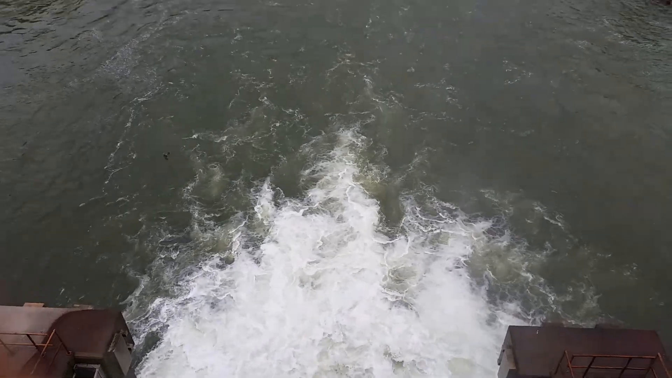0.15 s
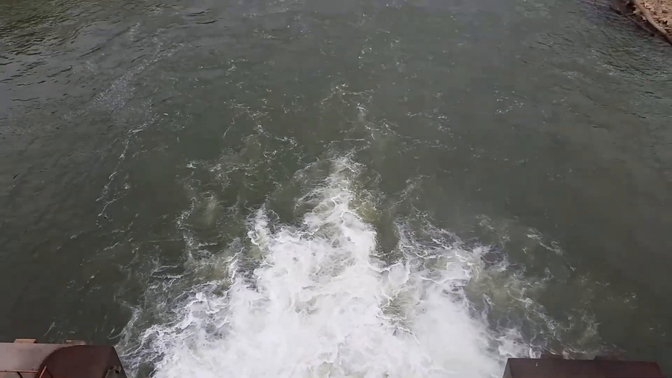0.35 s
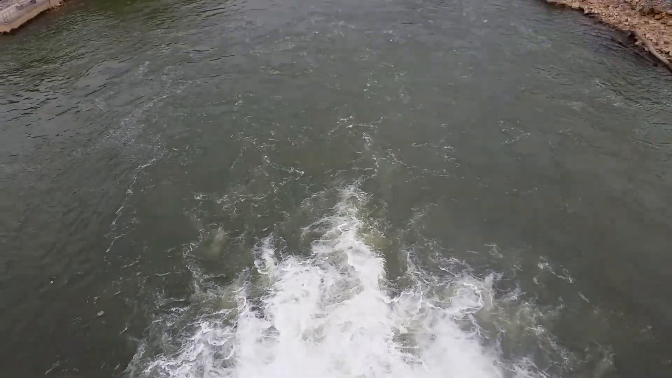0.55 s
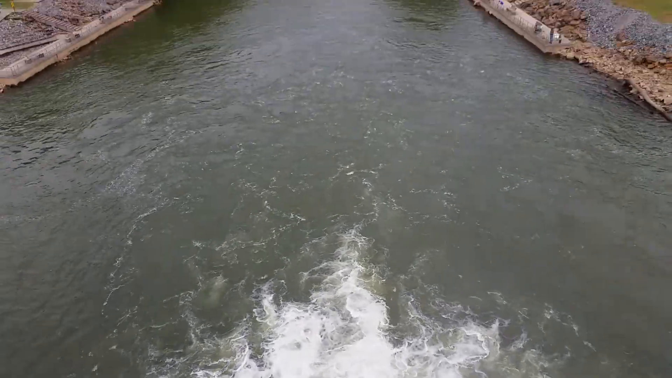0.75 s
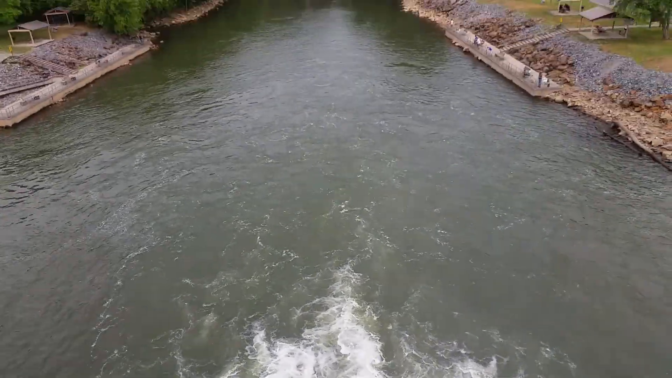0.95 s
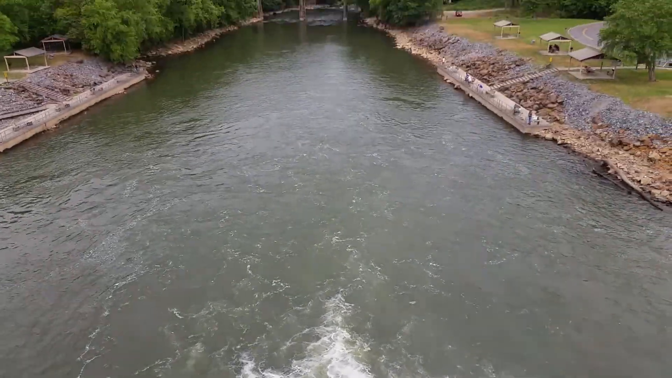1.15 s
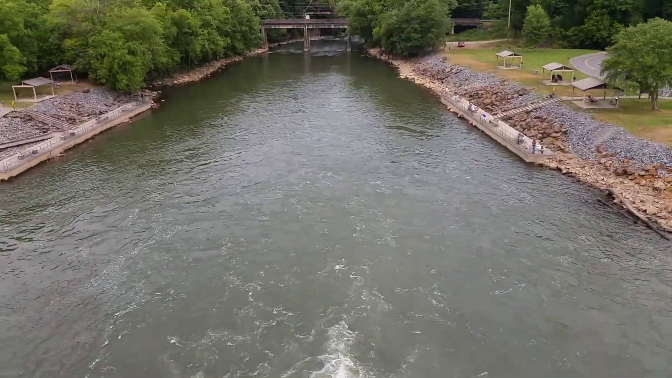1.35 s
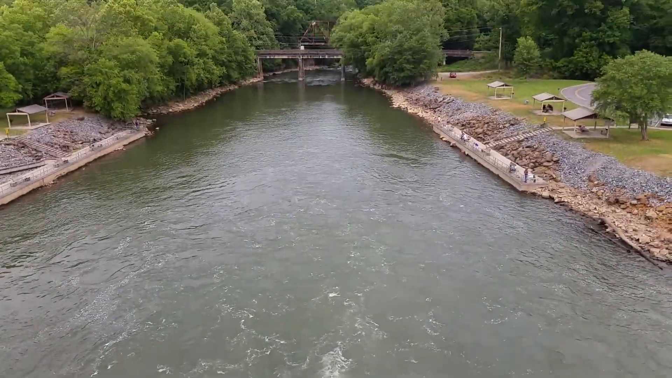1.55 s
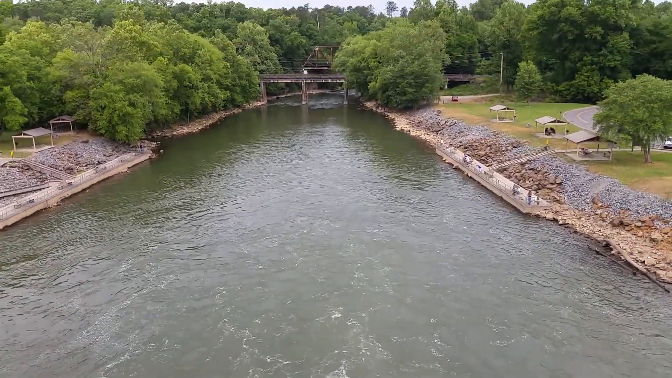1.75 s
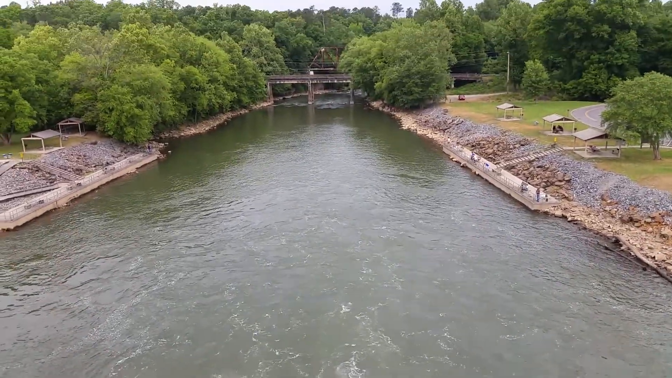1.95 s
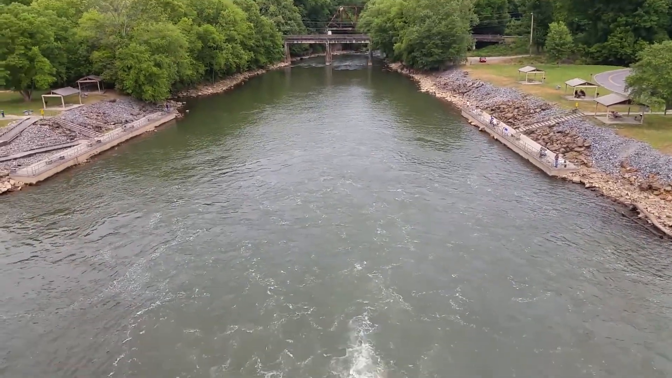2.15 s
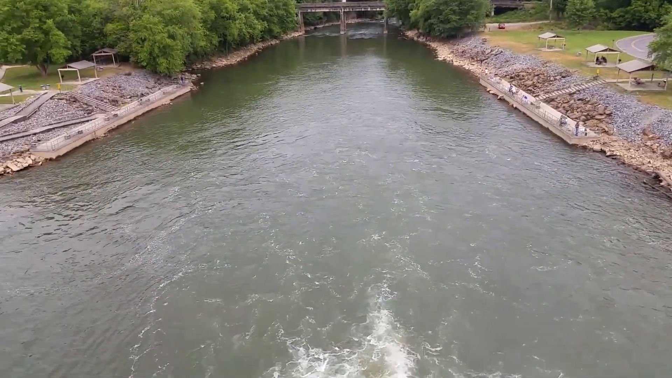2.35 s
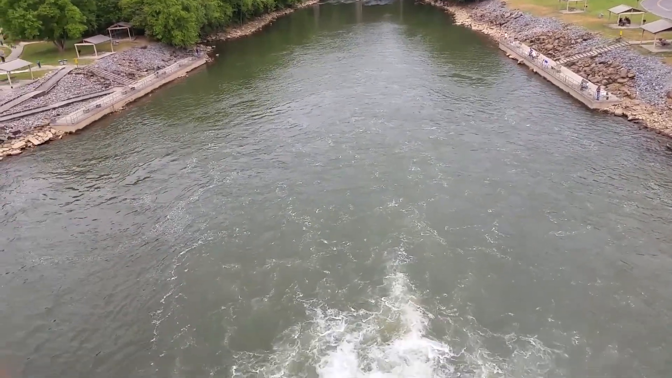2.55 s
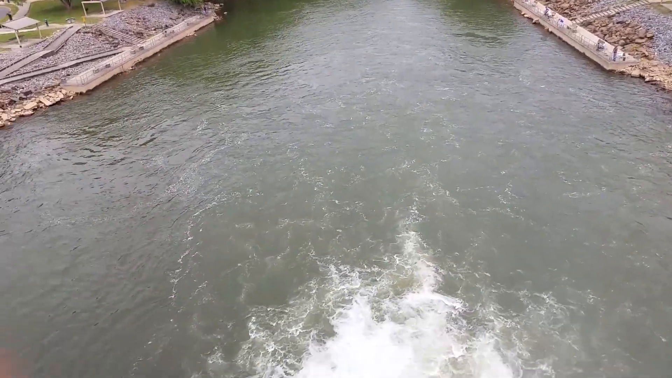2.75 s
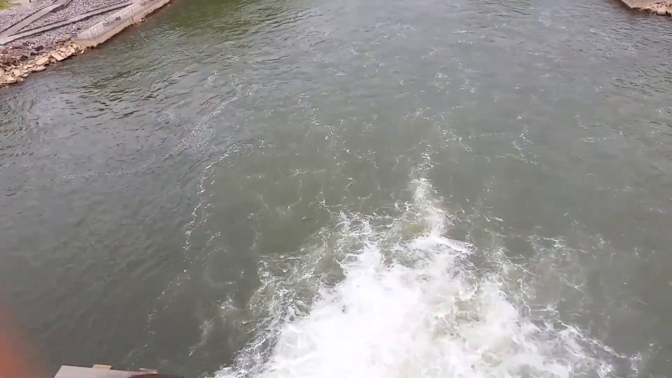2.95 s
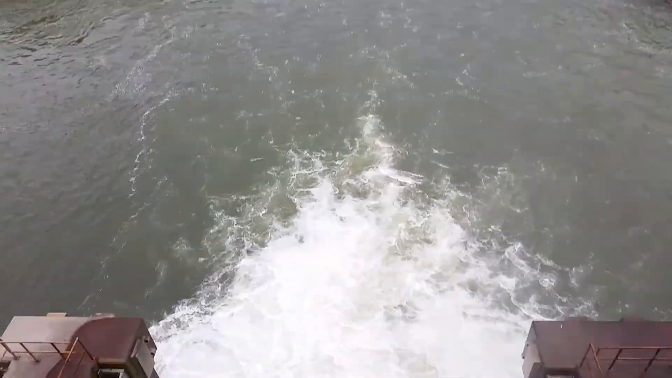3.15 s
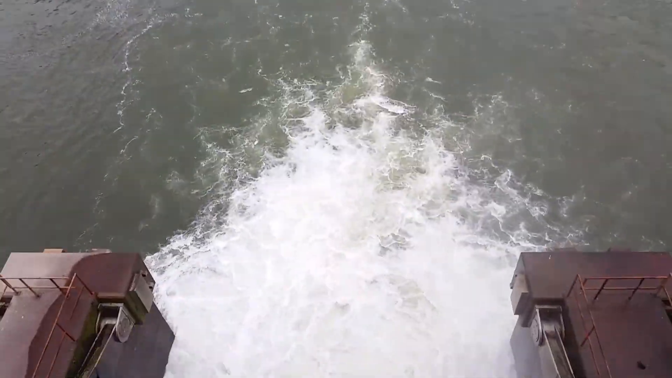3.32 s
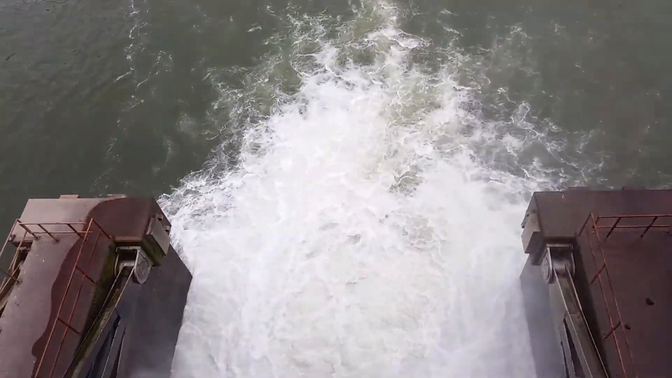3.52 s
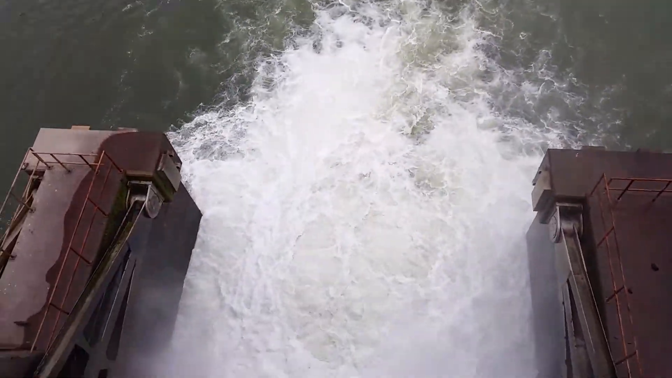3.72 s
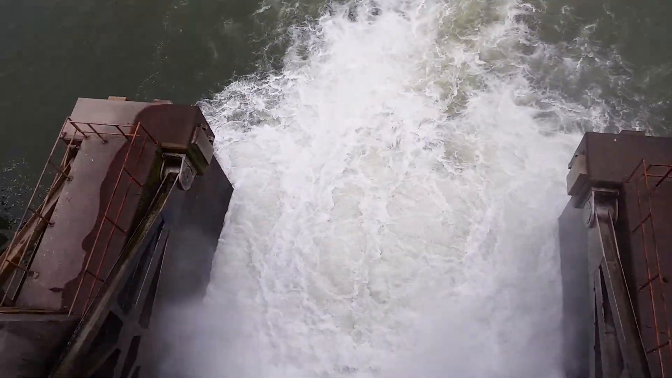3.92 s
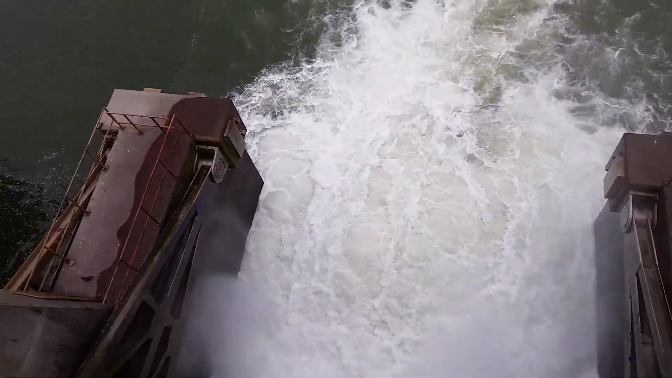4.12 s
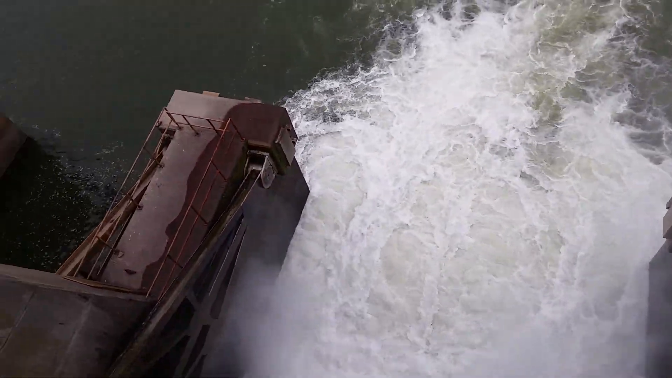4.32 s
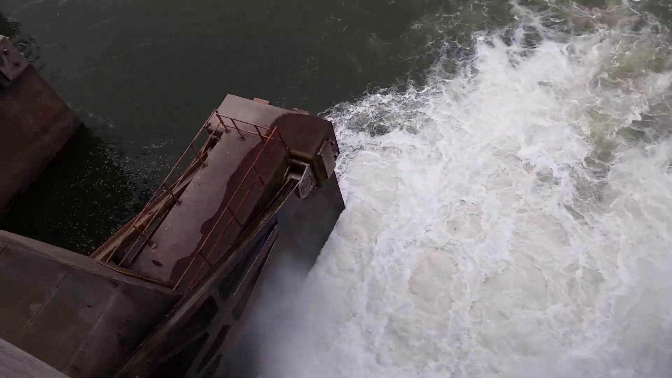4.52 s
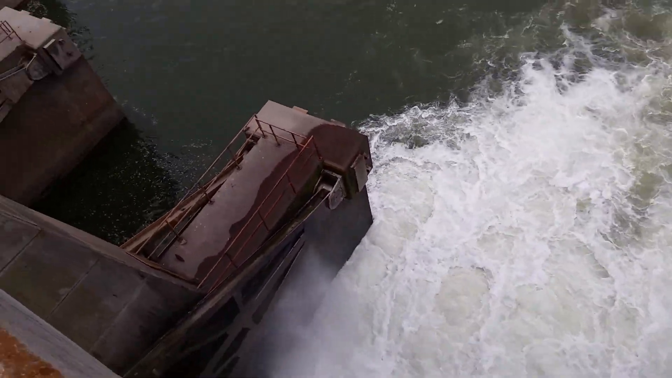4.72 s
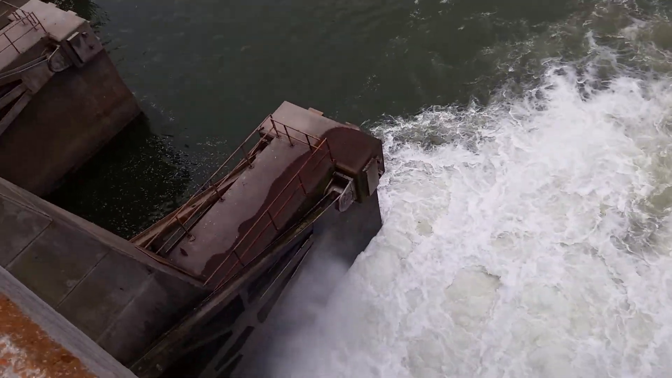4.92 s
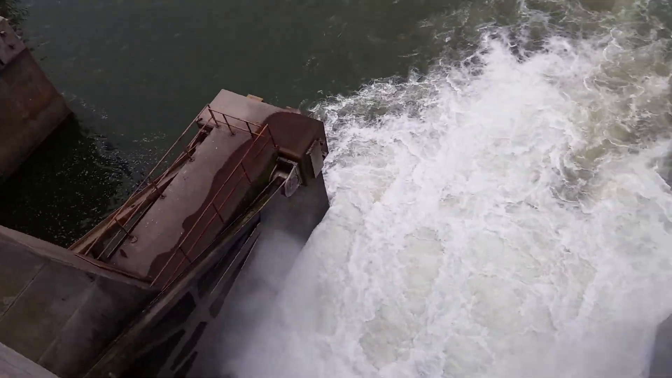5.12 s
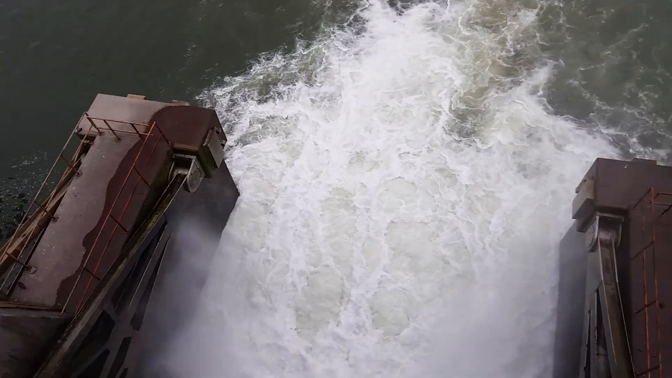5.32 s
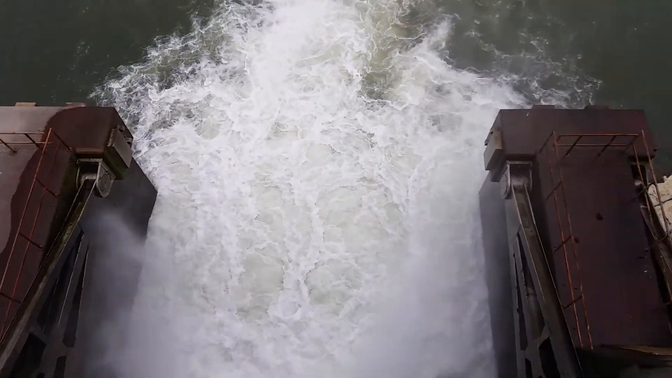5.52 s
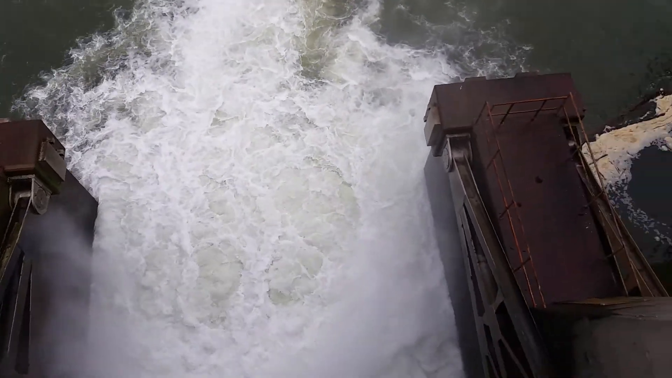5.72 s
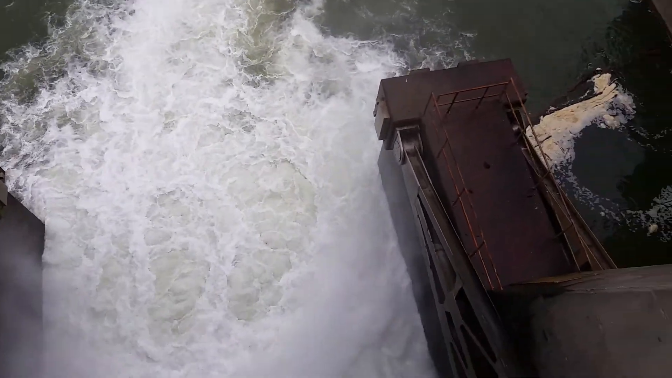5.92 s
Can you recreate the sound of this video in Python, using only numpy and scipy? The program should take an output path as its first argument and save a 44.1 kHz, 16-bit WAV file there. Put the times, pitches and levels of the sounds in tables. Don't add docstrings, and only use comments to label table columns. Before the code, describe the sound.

Outdoors on top of a dam, water blasts from outlet gates below. After brief silence a low rumble and dull, screened roar fade in. Wind gusts buffet the handheld stereo microphone, with thumps and a small click on its case just past three seconds. Then the sound opens into loud, bright, hissing white water that stays steady to the end.

```python
import sys
import numpy as np
from scipy import signal
from scipy.fft import rfft, irfft, next_fast_len
from scipy.io import wavfile
from scipy.ndimage import uniform_filter1d, minimum_filter1d, map_coordinates

SR = 44100
rng = np.random.default_rng(int(sys.argv[2]) if len(sys.argv) > 2 else 0)


def linear_from_db(decibels):
    return 10 ** (np.asarray(decibels, float) / 20)


def inscribe(sig):
    pcm = np.round(np.clip(np.atleast_2d(sig).T, -1, 1) * 32767)
    wavfile.write(sys.argv[1], SR, pcm.astype(np.int16))


N = 263277

# frequency in Hz, left-right likeness from -1 to 1.
ALIKE_IN_VIEW = [(100, 1), (650, .88), (1000, 0.51), (1500, 0.29), (1800, -0.51), (2100, 0.24),
                 (2350, 0.52), (2800, 0.41), (3200, -0.59), (4000, 0.14)]


def unit(x):
    return x / np.sqrt(np.mean(x ** 2) + 1e-20)


def along(points, hz):
    f, v = np.transpose(points)
    return np.interp(np.log(hz + 1), np.log(f + 1), v)


def curves(rows):
    s, *columns = np.transpose(rows)
    t = np.arange(N) / SR
    return np.array([np.interp(t, s, column) for column in columns])


def wobble(rate):
    knots = rng.standard_normal(int(N * 40 / SR) + 4)
    return map_coordinates(knots, [np.arange(N) * min(rate, 40) / SR])


def filtered(x, response):
    m = next_fast_len(N + 8192)
    hz = np.fft.rfftfreq(m, 1 / SR)
    return irfft(rfft(x, m) * response(hz), m)[..., :N]


def low_band(hz):
    return 1 / np.sqrt(1 + (hz / 300) ** 6)


def high_band(hz):
    return np.sqrt(1 - low_band(hz) ** 2)


def churn(patchy_db, splash_db, splash_s):
    hz, t, z = signal.stft(rng.standard_normal((2, N)), SR, nperseg=256)
    chance = rng.standard_normal((2,) + z.shape[1:])
    patches = uniform_filter1d(chance[0], size=4, axis=0)
    patches = uniform_filter1d(patches, size=30, axis=1)
    bursts = uniform_filter1d(chance[1], size=40, axis=0) ** 2
    decay = np.exp(-t[1] / splash_s)
    splashes = signal.lfilter([1], [1, -decay], bursts - bursts.mean(), axis=1)
    bright = np.clip(hz / 3000, 0, 1)[:, None]
    field = linear_from_db(patchy_db * unit(patches) + splash_db * bright * unit(splashes))
    return unit(signal.istft(z * field, SR, nperseg=256)[1][:, :N])


def ports(pair, alike, left, right, lag_s, band):
    def mid_side(hz):
        turn = np.arccos(np.clip(along(alike, hz), -1, 1)) / 2
        return np.array([np.cos(turn), np.sin(turn)])

    def colour_and_delay(hz):
        colour = linear_from_db([along(left, hz), along(right, hz)]) * np.sqrt(SR / 2) * band(hz)
        return colour * np.exp(-1j * np.pi * hz * lag_s * np.array([[1], [-1]]))

    mid, side = filtered(pair, mid_side)
    return filtered(np.array([mid + side, mid - side]), colour_and_delay)


def plunge_rumble():
    # frequency in Hz, level in dB per Hz.
    rumble_left = [(22, -77), (40, -48), (70, -43.5), (130, -44), (220, -47.5), (400, -56)]
    rumble_right = [(22, -80), (40, -42.5), (70, -43.5), (130, -40), (220, -46), (400, -50.5)]
    pool = churn(patchy_db=-0.57, splash_db=3.5, splash_s=0.1)
    return ports(pool, ALIKE_IN_VIEW, rumble_left, rumble_right, lag_s=-0.000019, band=low_band)


def screened_roar():
    # frequency in Hz, level in dB per Hz.
    screened_left = [(250, -48.5), (550, -61.5), (900, -62), (1250, -67), (1800, -64.5), (2250, -61),
                     (2800, -66.5), (3400, -69.5), (4900, -74), (6800, -86), (8800, -78.5), (10400, -64),
                     (12500, -77.5), (15700, -84.9)]
    screened_right = [(250, -46.5), (600, -64.5), (750, -61.5), (1700, -73.5), (2100, -67.5), (3000, -78.5),
                      (4000, -76), (5800, -81.5), (7300, -91), (8800, -124), (9700, -102), (10500, -100),
                      (13500, -79), (15700, -76)]
    # frequency in Hz, left-right likeness (beyond -1..1 is clipped).
    alike_screened = [(100, 1), (700, 0.84), (1100, -0.079), (1450, 0.8), (1800, -0.94), (2050, 0.27),
                      (2400, -1.1), (2900, -0.25), (3200, 0.98), (4000, 0.11)]
    jet = churn(patchy_db=-0.5, splash_db=1.04, splash_s=0.054)
    return ports(jet, alike_screened, screened_left, screened_right, lag_s=-0.00013, band=high_band)


def open_spray():
    # frequency in Hz, level in dB per Hz.
    direct_left = [(220, -43), (380, -55.5), (520, -53), (950, -59.5), (1300, -60.2), (2500, -66),
                   (3300, -69.5), (3800, -68), (4400, -72.5), (6200, -75.5), (8000, -70), (10200, -57.5),
                   (12500, -63.5), (15700, -69.5)]
    direct_right = [(220, -43), (380, -54), (550, -51.5), (1000, -57), (1900, -59), (2900, -71.5),
                    (3600, -68.5), (4400, -77), (5900, -71.5), (7500, -81), (9000, -107), (11500, -68.5),
                    (14200, -63.5), (15700, -55.5)]
    jet = churn(patchy_db=0.3, splash_db=0.63, splash_s=0.018)
    return ports(jet, ALIKE_IN_VIEW, direct_left, direct_right, lag_s=.00006, band=high_band)


def water():
    # time in seconds, sight of the jet over the parapet in dB,
    # right port's lead in dB, shade of hand and body in dB.
    lean = [(.26, -40, 0, -1.5), (.5, -40, 0, -6), (.75, -40, 0, -4.5), (.92, -41, 3, -0.5),
            (1.5, -26, 0, 0), (2.2, -23, -4, 0), (2.5, -19, 10, -1), (2.75, -24, 6, -3),
            (2.9, -15.5, 10, -1.5), (3.05, -12.5, 6, -1), (3.2, -8, -4.5, -1), (3.33, -2, 1, -0.5),
            (3.5, -1.4, -1, 1), (3.8, 0.5, 0, 0), (4.6, 0, 0, -1), (5.15, -0.44, 0.5, -0.8),
            (5.55, 0, -1, .2), (5.97, 0, -.5, 0.5)]
    sight_db, lead_db, shade_db = curves(lean)
    seen = linear_from_db(sight_db + lead_db * np.array([[-.5], [.5]]))
    left_over = 0.071
    hidden = (np.clip(1 - seen, 0, 1) + left_over) * linear_from_db(0.51 * shade_db)
    surge_db = .5 * wobble(3.19) + 0.13 * wobble(13)

    rumble = plunge_rumble()
    roar = hidden * screened_roar() + seen * open_spray()
    upper = filtered(roar, lambda hz: np.exp(-(np.log(hz / 6000 + 1e-9) / 0.64) ** 2))
    roar = roar + (linear_from_db(shade_db) - 1) * upper
    plunge_db = -1.26 + 1.07 * linear_from_db(sight_db) + 0.3 * shade_db + 2.1 * surge_db
    return linear_from_db(plunge_db) * rumble + linear_from_db(surge_db) * roar


def taps():
    # time in seconds, ring in dB, air push in dB.
    touches = [
        (3.1498, -18, -16),
        (3.1643, -15, .5),
        (3.1677, 1, -25),
    ]
    # frequency in Hz, level in dB, t60 in seconds.
    case_modes = [(1600, -.5, .012), (2600, -9, .012), (3400, -1.5, .012), (4300, -10, .012),
                  (5200, -21, .012)]
    contact_s = .0024
    out, t = np.zeros(N), np.arange(900) / SR
    ring = sum(linear_from_db(db - 60 * t / t60) * np.sin(2 * np.pi * hz * t) for hz, db, t60 in case_modes)
    touch = np.sin(np.pi * np.clip(t / contact_s, 0, 1)) ** 2
    push = np.exp(-((t - .0006) / .0003) ** 2)
    push = push - .5 * np.exp(-((t - .0028) / .0014) ** 2)
    for s, ring_db, push_db in touches:
        tap = linear_from_db(ring_db + 3) * touch * ring + linear_from_db(push_db) * push
        out[round(s * SR):][:len(t)] += tap
    return out * linear_from_db([[.5], [-15]])


def gustiness():
    # start in seconds, hold in seconds, level in dB, port (0 left, 1 right).
    gust_events = [(1.614, 0.19, -38, 1), (1.70, 0.08, -24, 0), (1.84, .1, -14.5, 0), (2.05, 0.21, -21, 0),
                   (2.174, 0.27, -23, 1), (2.3, 0.062, -25.5, 0), (2.512, 0.18, -16.5, 0),
                   (2.53, 0.075, -13.5, 1), (2.646, .06, -14, 1), (2.717, 0.098, -9, 1),
                   (2.75, .03, -17, 0), (2.838, 0.11, -12.5, 0), (2.854, 0.135, -15, 1),
                   (3.0, 0.14, -11, 0), (3.153, 0.055, -14, 0), (3.102, 0.22, -23, 1),
                   (3.4, 0.22, -21.5, 1), (3.413, 0.069, -23, 0), (3.658, .2, -33, 1),
                   (4.376, 0.26, -29.5, 1)]
    breeze_db = [-37.5, -36.5]
    attack_s, release_s = 0.014, 0.013
    t = np.arange(N) / SR
    level = linear_from_db(breeze_db)[:, None] * np.ones(N)
    for s, hold, db, port in gust_events:
        rise = np.clip((t - s) / attack_s + .5, 0, 1)
        release = np.exp(-np.maximum(t - s - hold, 0) / release_s)
        level[round(port)] += linear_from_db(db) * rise * release
    return level


def wind():
    # frequency in Hz, level in dB per Hz.
    buffet = [(15, -13), (40, -17), (62, -2), (98, -3), (170, -9), (300, -21.5), (500, -37), (1200, -38.5),
              (4000, -82)]
    # time in seconds, peak in dB, pitch in Hz, port (0 left, 1 right).
    thumps = [
        (3.081, -4, 176, 1),
        (3.2053, 3, 195, 1),
        (3.269, -5, 149, 1),
    ]
    lumps = linear_from_db(2.3 * np.array([wobble(18), wobble(18)]))
    eddies = filtered(lumps * rng.standard_normal((2, N)), lambda hz: linear_from_db(along(buffet, hz)))
    out = gustiness() * unit(eddies)
    t = np.arange(-400, 600) / SR
    for s, db, hz, port in thumps:
        push = np.sin(2 * np.pi * hz * t) * np.exp(-(hz * t - .3) ** 2 / 0.28)
        out[round(port), round(s * SR) - 400:][:len(t)] += linear_from_db(db) * push
    return out


def scene():
    return water() + wind() + taps()


def band_limit(x):
    return signal.sosfilt(signal.butter(12, 16550, fs=SR, output="sos"), x)


def record(dry):
    top_hz, rumble_cut_hz = 15850, 15
    fade_start_s, fade_end_s = .2645, 0.91
    loudness = np.sqrt(np.abs(uniform_filter1d(dry ** 2, size=4000, axis=1)))
    ducked = dry / (1 + (loudness / 0.85) ** 2) ** 0.17
    peak_gain = np.minimum(1, .92 / (np.abs(ducked) + 1e-9))
    held = uniform_filter1d(minimum_filter1d(peak_gain, size=133, axis=1), size=67, axis=1)
    limited = filtered(ducked * held, lambda hz: (hz < top_hz) * hz ** 2 / (hz ** 2 + rumble_cut_hz ** 2))
    fade = np.clip((np.arange(N) / SR - fade_start_s) / (fade_end_s - fade_start_s), 0, 1)
    return band_limit(limited * fade)


dry = scene()
out = record(dry)
inscribe(out)
```